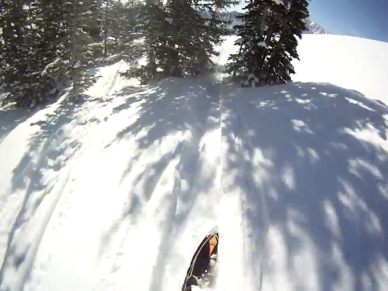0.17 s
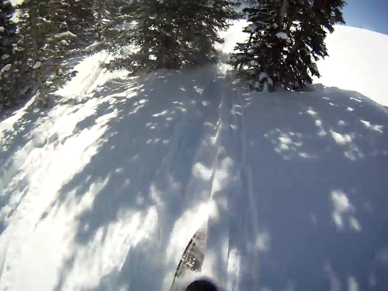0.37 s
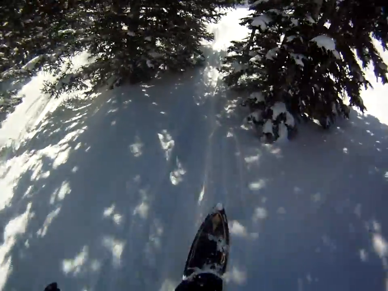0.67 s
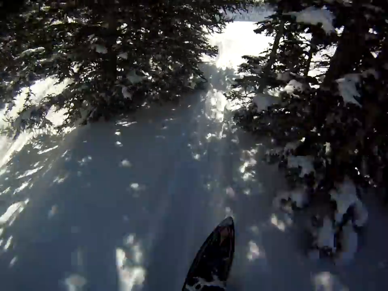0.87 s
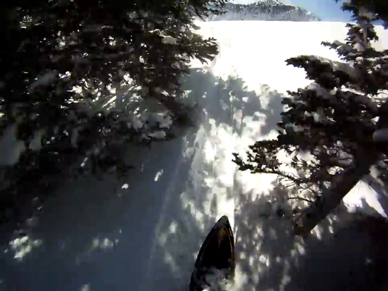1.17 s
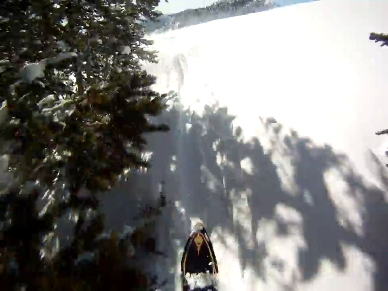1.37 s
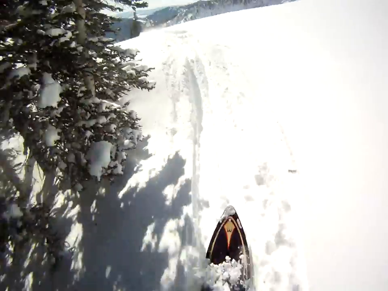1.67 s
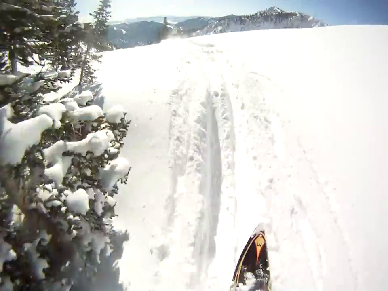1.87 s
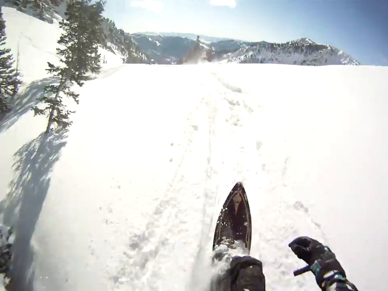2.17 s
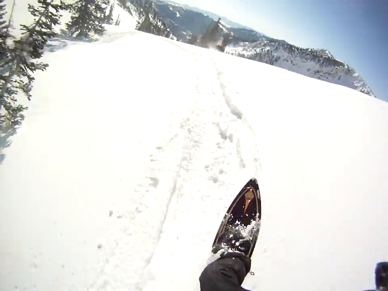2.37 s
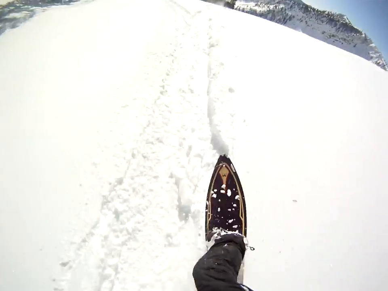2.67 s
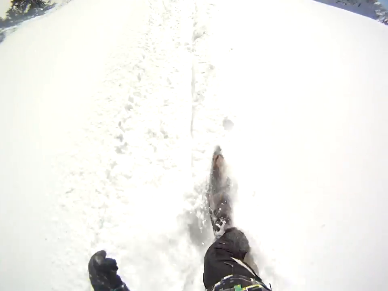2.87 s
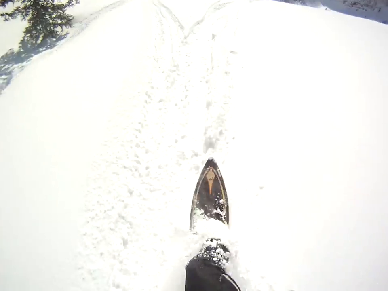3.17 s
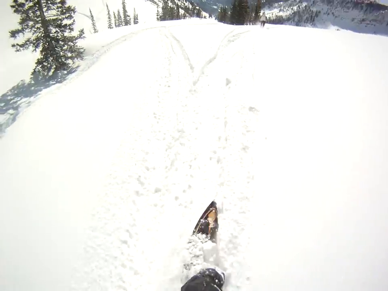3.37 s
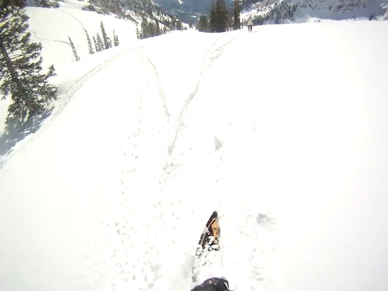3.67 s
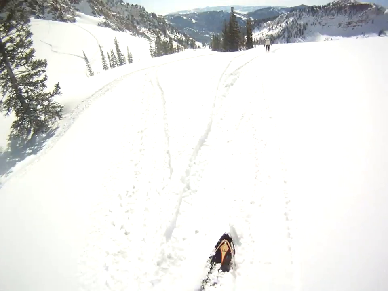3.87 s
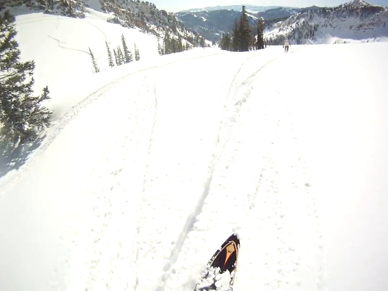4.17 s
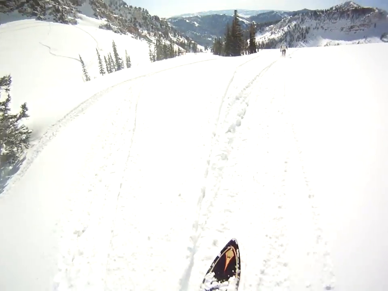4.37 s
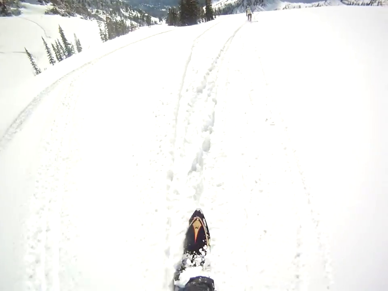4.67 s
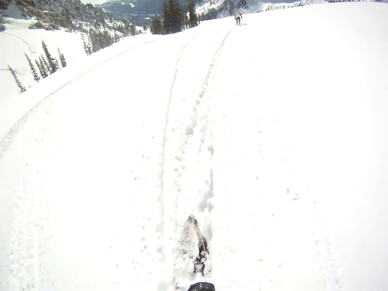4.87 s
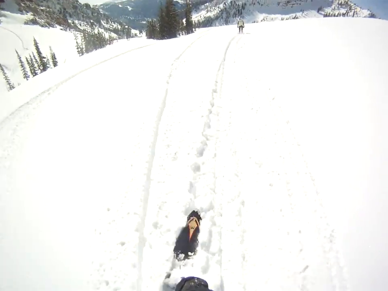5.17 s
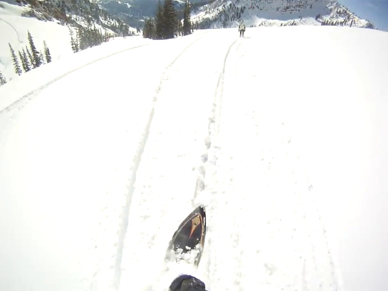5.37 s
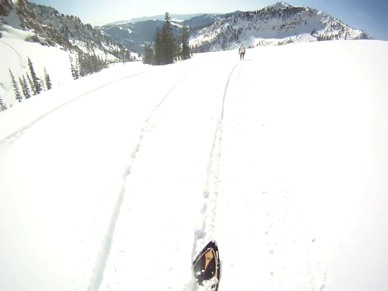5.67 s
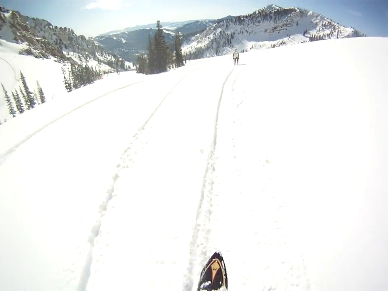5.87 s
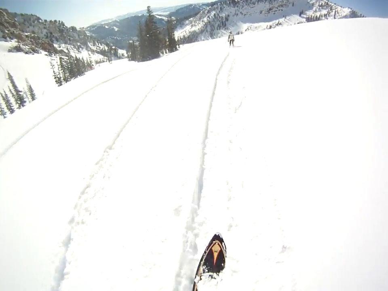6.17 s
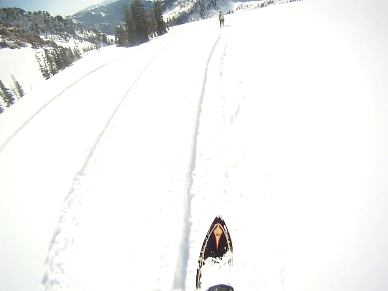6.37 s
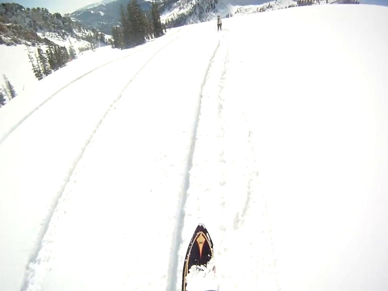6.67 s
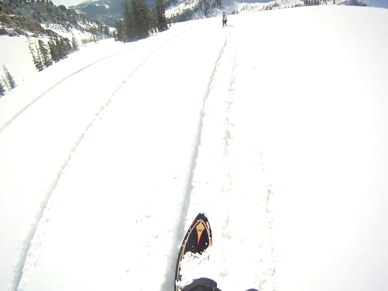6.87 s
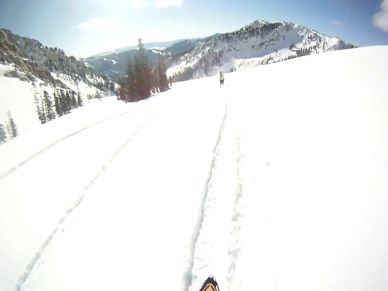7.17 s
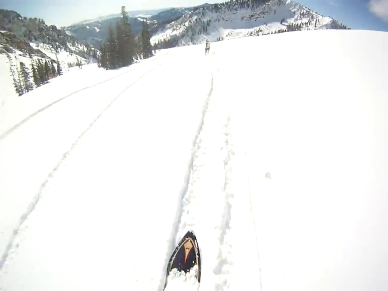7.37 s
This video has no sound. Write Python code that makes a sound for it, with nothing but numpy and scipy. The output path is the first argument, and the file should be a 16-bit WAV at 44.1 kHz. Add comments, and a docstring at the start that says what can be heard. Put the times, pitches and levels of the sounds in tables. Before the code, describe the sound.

Muffled, grainy rush of skis over snow, lumpy wind buffeting, sharp twig ticks and hollow clacks, easing into a quieter, steadier glide.

```python
"""Skis hiss through deep powder, a roar of crystal grains under crisper spray, heard inside a closed camera case.
Wind rumbles on the case as lumpy low noise, and sudden bumps swing the camera until its springy mount rings.
Gear knocks and flicking twigs are struck resonances; a faint whistle and a thin squeak are gliding tones.
A limiter ducks the loudest peaks, and slow sampling with held values mirrors the sound into the treble."""
import sys
import numpy as np
from scipy import signal
from scipy.fft import rfft, irfft
from scipy.io import wavfile
from scipy.ndimage import uniform_filter1d, minimum_filter1d

SR = 44100
rng = np.random.default_rng(int(sys.argv[2]) if len(sys.argv) > 2 else 0)


def transcribe(signal):
    """Save signal, clipped to [-1, 1], as a 16-bit WAV file at the path in sys.argv[1]."""
    frames = np.atleast_2d(signal).T
    limited = np.clip(frames, -1, 1)
    pcm = np.round(limited * 32767).astype(np.int16)
    wavfile.write(sys.argv[1], SR, pcm)


N = 332514
TIME, FREQS = np.arange(N) / SR, np.fft.rfftfreq(N, 1 / SR)

# airflow over the case, before the layer trims: t/s, level/dB
AIRFLOW = [(0, -39), (0.9, -41), (1.3, -36), (2.4, -42), (3.15, -43), (3.6, -40.5), (4.3, -44),
           (4.9, -43.5), (5.8, -45), (6.9, -41), (7.54, -38.5)]
# gusts of deep buffeting: middle t/s, length/s, level/dB
GUST_SWELLS = [(0.04, 0.13, -28), (0.554, 0.29, -33.5), (1.165, .16, -34), (1.673, 0.15, -26),
               (2.133, 0.15, -31.5), (2.42, 0.36, -32.5), (2.95, 0.21, -30), (3.203, 0.15, -35),
               (3.527, 0.27, -42.5), (4.18, 0.135, -42), (7.27, 0.23, -50)]
# colour of the wind rumble: f/Hz, relative level per Hz/dB
RUMBLE_COLOUR = [(30, -9.5), (60, 0.5), (85, 1.5), (125, -8), (200, -10.5), (300, -22), (420, -26.5),
                 (1500, -68)]
# colour of the deepest wind lumps: f/Hz, relative level per Hz/dB
BUFFET_COLOUR = [(10, -9), (24, 9.5), (40, -0.5), (60, 1), (100, -2), (300, -71)]
# a faint sinking whistle: start t/s, length/s, start f/Hz, end f/Hz
WHISTLE_GLIDE = (7.03, 0.21, 925, 810)
# a thin rising squeak: start t/s, length/s, start f/Hz, end f/Hz
SQUEAK_GLIDE = (7.07, 0.21, 3200, 4380)
# twigs and lumps that hit the case: t/s, level before trim/dB, brightness/dB per octave
TICK_HITS = [(0.0477, -18, 2), (0.0674, -28.5, -1), (0.324, -23.5, -8), (1.404, -31.5, -3),
             (1.515, -25, -6), (1.5358, -21, -10), (1.6254, -21, -13), (1.5454, -35, -6), (1.5918, -32, -3),
             (1.657, -23.5, 4), (1.6887, -21, -10), (1.711, -0.5, 0.0), (2.011, -25.5, -4.5),
             (2.373, -31.5, 0), (2.6444, -30, -1), (2.812, -39, -2), (2.8873, -30, -2), (2.9227, -28, -2),
             (6.4164, -34, -8), (6.483, -35, -10), (7.414, -35, 1), (7.4294, -27, -4)]
# resonances that ticks and crumbs ring with: f/Hz, relative level/dB, t60/s
SHELL_MODES = [(1120, -14, 0.015), (1620, -1, 0.0035), (2290, 0, 0.0087), (3040, -1, 0.0063),
               (3584, -0.5, 0.015), (4070, -3, 0.0052), (4850, 6, 0.0043), (5580, -5, 0.0031)]
# knocks of the gear: t/s, peak level/dB, brightness/dB per octave, favoured f/Hz
KNOCK_HITS = [(1.713, -24.5, 4.5, 920), (2.165, -18.5, 1.5, 1740), (2.424, -22.5, -8, 250),
              (2.448, -3, -3, 540), (2.450, -11.5, 2, 1600), (2.634, -15.5, 0.5, 575),
              (3.433, -19, -1, 855), (6.916, -16.5, -0.5, 870), (6.924, -20, 4, 1500),
              (7.246, -26.5, -5, 860), (7.2731, -12, -1, 595), (7.276, -19, -2, 1770),
              (7.281, -23, 2, 1610), (7.306, -29, 4, 2020), (7.410, -21, -2.5, 595)]
# resonances that knocks ring with: f/Hz, relative level/dB, t60/s
GEAR_MODES = [(241, -14.5, 0.039), (575, -5.5, 0.033), (865, -1.5, 0.026), (1012, -4.5, 0.03),
              (1130, 7, 0.012), (1645, -1, 0.013), (1870, -4.5, 0.029), (2100, 3, 0.013),
              (2760, -7, 0.0076), (3230, -8, 0.017)]
# bumps that shove the camera: t/s, level/dB, swing f/Hz
BUMP_SHOVES = [(0.034, -26, 67.6), (0.06, -23.5, 165), (0.315, -17.5, 101), (0.584, -27, 170),
               (0.591, -19.5, 67), (1.101, -14, 63.5), (1.154, -22.5, 114), (1.496, -18, 107),
               (1.603, -30, 65), (1.692, -14, 67), (2.002, -23.5, 89), (2.264, -24.5, 129),
               (2.447, 4.5, 117), (2.553, -29, 139), (2.582, -17, 54.7), (2.623, -22, 130),
               (2.635, -3.5, 81.5), (2.887, -19.5, 105), (3.128, -24, 107), (3.219, -29, 87),
               (3.437, -27, 82), (4.126, -33, 107), (6.92, -28, 93), (7.106, -23, 94), (7.249, -19.5, 101),
               (7.277, -19.5, 65), (7.314, -11, 81), (7.394, -22, 109), (7.413, -10, 56)]
# resonances of the mount, against the shove: f/Hz, relative level/dB, t60/s
MOUNT_MODES = [(82, -5.5, 0.18), (170, -1.5, 0.037), (263, -56, 0.029)]
# steady hiss of the skis, before a small trim: t/s, level/dB
GLIDE_LEVEL = [(0.0, -39), (0.67, -39.5), (1.22, -38), (1.55, -40), (1.7, -40), (2.04, -42.5),
               (2.27, -42.5), (2.56, -44), (2.96, -44), (3.11, -45.5), (3.44, -49), (4.37, -46.5),
               (4.68, -51), (6.19, -46.5), (6.7, -47), (7.54, -45.5)]
# swishes, where a ski digs in or a branch sweeps by: middle t/s, length/s, hiss level/dB, spray level/dB
SWISH_SWELLS = [(0.213, 0.17, -53, -47.5), (1.125, 0.21, -35.5, -41.5), (1.541, 0.034, -30, -37.5),
                (1.605, 0.044, -33.5, -46.5), (1.993, 0.2, -40, -65), (2.44, 0.051, -40.5, -49),
                (2.584, 0.15, -40, -53.5), (2.898, 0.12, -43.5, -53.5), (3.07, 0.067, -41, -54),
                (3.48, 0.047, -61, -53.5), (3.913, 0.16, -48.5, -61), (4.52, .10, -45.5, -64),
                (5.33, .12, -61, -59), (6.02, 0.31, -63, -58.5), (7.364, 0.25, -44, -52.5)]
# colour of the ski hiss, before the case: f/Hz, relative level per Hz/dB
HISS_COLOUR = [(100, -7), (300, -4.5), (480, -4.5), (730, -6), (1100, 0.5), (1500, 2.5), (2250, 1),
               (2700, -12), (3500, -12.5), (3900, -18.5), (5200, -22.5), (5900, -48.5)]
# colour of the crisp spray, before the case: f/Hz, relative level per Hz/dB
SPRAY_COLOUR = [(500, -8), (1500, -10), (2400, 1), (3400, 13), (4000, -2), (5200, -3.5), (5900, -29.5)]
# resonances of the case: f/Hz, width at half the dB lift/Hz, lift/dB
CASE_RESONANCES = [(572, 120, 6.5), (859, 148, 8), (1203, 324, 7), (1886, 95, 3), (2105, 280, 3),
                   (3500, 110, 1)]


def gain_of(db):
    """Decibels to amplitude."""
    return 10 ** (np.asarray(db) / 20)


def evened(x):
    """Scales to rms 1."""
    return x / np.sqrt(np.mean(x ** 2) + 1e-20)


def read(points):
    """Reads a spectrum table in dB at every frequency, along a log axis."""
    hz, db = np.transpose(points)
    return np.interp(np.log(FREQS + 1), np.log(hz), db)


def coloured(x, db):
    """Filters by a dB spectrum; rms 1."""
    return evened(irfft(rfft(x) * gain_of(db), N))


def drift(rate):
    """Slow random wander of rms 1, with little motion above rate in Hz."""
    spectrum = rfft(rng.standard_normal(N))
    return evened(irfft(spectrum / (1 + (FREQS / rate) ** 4), N))


def swell(middle, length):
    """A smooth rise and fall that passes half its height length seconds apart."""
    return 0.5 ** np.minimum((2 * (TIME - middle) / length) ** 2, 100)


def add(mix, s, sound):
    """Mixes a sound in at s seconds."""
    part = mix[max(round(s * SR), 0):][:len(sound)]
    part += sound[:len(part)]


def grains(per_s, spread_db):
    """Random clicks, most of them small and a few large; rms 1."""
    size = gain_of(spread_db * np.minimum(rng.exponential(1, N), 4.5))
    sign = rng.choice([-1, 1], N)
    present = rng.random(N) < per_s / SR
    return evened(size * sign * present)


def hum(hz, sharpness):
    """Noise through one resonance; rms 1."""
    detune = FREQS / hz - hz / (FREQS + 1)
    resonance_db = -10 * np.log10(1 + (sharpness * detune) ** 2)
    return coloured(rng.standard_normal(N), resonance_db)


def strike(modes, lift_db, scrape_db, scrape_s, crack_db, crack_s):
    """A sharp contact and brief scrape excite the lifted modes, under the contact's dry crack; peak 1."""
    t = np.arange(SR // 12) / SR
    hz, mode_db, t60 = np.transpose(modes)[:, :, None]
    force = gain_of(scrape_db) * rng.standard_normal(len(t)) * np.exp(-t / scrape_s)
    force[0] += 1  # the sharp contact
    detuned = hz * (1 + 0.0056 * rng.standard_normal(hz.shape))
    side = (-1) ** np.arange(len(hz))[:, None]  # neighbouring modes swing opposite ways
    decay = gain_of(mode_db + lift_db[:, None] - 60 * t / t60)
    ring = side * np.sin(2 * np.pi * detuned * t) * decay
    blow = signal.fftconvolve(force, ring.sum(0))[:len(t)]
    u = t / crack_s
    crack = u * (2 - u) * np.exp(-u)
    blow = blow / abs(blow).max() - gain_of(crack_db) * crack / crack.max()
    return blow / abs(blow).max()


def tone(glide, waver, ratio=1):
    """A thin tone that swells and fades as it glides, wavering a little, at ratio times the given pitch."""
    start, length, from_hz, to_hz = glide
    u = np.clip((TIME - start) / length, 0, 1)
    hz = ratio * (from_hz + (to_hz - from_hz) * u) * (1 + waver * drift(rate=113))
    turns = np.cumsum(hz) / SR
    return np.sqrt(2) * np.sin(2 * np.pi * turns) * np.sin(np.pi * u)


def jolts(airflow, hz=95, length_s=0.0047):
    """Small unevennesses of the slope jog the camera at random, harder where the airflow is stronger."""
    t = np.arange(SR // 12) / SR
    jog = np.sin(2 * np.pi * hz * t) * t * np.exp(-t / length_s)
    jogs = signal.oaconvolve(grains(per_s=16, spread_db=1.5), jog)[:N]
    return airflow * evened(jogs) * gain_of(-9)


def wind():
    """Lumpy turbulence presses on the case, keeps the mount humming and blows a faint hollow note, over jolts."""
    airflow = gain_of(np.interp(TIME, *np.transpose(AIRFLOW)) + 0.5)
    gusts = sum(gain_of(db) * swell(s, length) for s, length, db in GUST_SWELLS)
    eddies = drift(rate=22)
    buffet = coloured(rng.standard_normal(N), read(BUFFET_COLOUR))
    buffet *= np.hypot(airflow * gain_of(-4.5), gusts) * gain_of(0.89 * eddies)
    rumble = coloured(rng.standard_normal(N), read(RUMBLE_COLOUR))
    rumble *= gain_of(2.6 * eddies - 4.5)
    mount = hum(hz=85.6, sharpness=5.6) * gain_of(-2.5)
    hollow = hum(hz=591, sharpness=9.4) * gain_of(-55.5)
    body = (rumble + mount) * np.hypot(airflow, gusts * gain_of(-8))
    return buffet + body + hollow + jolts(airflow)


def whistle():
    """A faint wavering tone sinks over the hiss."""
    return gain_of(-52) * tone(WHISTLE_GLIDE, waver=0.012)


def squeak():
    """A thin rising tone, like a sleeve sliding faster and faster, and a weaker companion above it."""
    main = tone(SQUEAK_GLIDE, waver=0.003)
    companion = gain_of(-8) * tone(SQUEAK_GLIDE, waver=0.005, ratio=1.2)
    return gain_of(-61) * (main + companion)


def ticks():
    """Twigs and crumbs flick the shell of the case, exciting its short, bright modes."""
    out, octaves = np.zeros(N), np.log2(np.transpose(SHELL_MODES)[0])
    for s, db, bright in TICK_HITS:
        tick = strike(SHELL_MODES, bright * octaves, scrape_db=-15, scrape_s=0.002, crack_db=-6, crack_s=0.00005)
        add(out, s, gain_of(db - 0.5) * tick)
    return out


def knocks(focus_db=8):
    """Hard gear clacks; where it lands decides which modes are favoured."""
    out, mode_hz = np.zeros(N), np.transpose(GEAR_MODES)[0]
    for s, db, bright, hz in KNOCK_HITS:
        octaves = np.log2(mode_hz / hz)
        nearness = np.exp(-(octaves / 0.2) ** 2)
        lift_db = bright * octaves + focus_db * nearness
        knock = strike(GEAR_MODES, lift_db, scrape_db=-18, scrape_s=0.002, crack_db=-7.5, crack_s=0.00025)
        add(out, s, gain_of(db) * knock)
    return out


def bumps(rise_cycles=0.55, softness=2.66):
    """Each bump swings the camera once or twice; the mount then rings out."""
    out, t = np.zeros(N), np.arange(SR // 4) / SR
    ring = sum(np.sin(2 * np.pi * hz * t) * gain_of(db - 60 * t / t60) for hz, db, t60 in MOUNT_MODES)
    for s, db, hz in BUMP_SHOVES:
        u = t * hz / rise_cycles  # the shove's envelope peaks at u = 1
        shove = np.sin(2 * np.pi * hz * t) * (u * np.exp(1 - u)) ** softness
        ring_in = 1 - np.exp(-3 * u)
        add(out, s, gain_of(db) * (shove + ring * ring_in))
    return out


def snow(spray_under_db=-15.5, spray_growth=1.17):
    """Crystals shear under the skis; crisper spray flies up and drops crumbs on the case; swishes swell all."""
    glide_db = np.interp(TIME, *np.transpose(GLIDE_LEVEL)) + 0.5
    hiss_level = gain_of(glide_db)
    # the spray lies under the hiss and follows its level changes more steeply
    mean_db = glide_db.mean()
    spray_level = gain_of(mean_db + spray_under_db + spray_growth * (glide_db - mean_db))
    for s, length, hiss_db, spray_db in SWISH_SWELLS:
        swish = swell(s, length)
        hiss_level = np.hypot(hiss_level, gain_of(hiss_db) * swish)
        spray_level = np.hypot(spray_level, gain_of(spray_db) * swish)
    case_db = sum(db / (1 + (2 * (FREQS - hz) / width) ** 4) for hz, width, db in CASE_RESONANCES)
    pressure = drift(rate=8.9)  # the load on the skis flutters over uneven snow
    hiss = coloured(grains(per_s=9000, spread_db=2.0), read(HISS_COLOUR) + case_db)
    hiss *= hiss_level * gain_of(1.08 * pressure)
    spray = coloured(grains(per_s=3700, spread_db=0.5), read(SPRAY_COLOUR) + case_db)
    spray *= spray_level * gain_of(1.74 * pressure)
    spray *= gain_of(1.1 * drift(rate=120) - 1.7)  # it arrives in small crunchy clumps
    no_lift = np.zeros(len(SHELL_MODES))
    crumb = strike(SHELL_MODES, no_lift, scrape_db=-7, scrape_s=0.0046, crack_db=-13, crack_s=0.00005)
    crumbs = evened(signal.oaconvolve(grains(per_s=40, spread_db=1.0), evened(crumb))[:N])
    crumbs *= spray_level * gain_of(-9.5)
    return hiss + spray + crumbs


def scene():
    """Everything reaches one microphone, fed alike to both channels."""
    tones = whistle()
    mono = snow() + wind() + bumps() + knocks() + ticks() + tones + squeak()
    return np.tile(mono, (2, 1))


def limit(x, ceiling_db=-7, recover_db_per_s=170, smooth_s=0.002):
    """Turns the gain down when the sound passes the ceiling, holds it briefly, then lets it back up."""
    level = uniform_filter1d(abs(x[0]), size=48)
    over_db = np.maximum(20 * np.log10(level + 1e-9) - ceiling_db, 0)
    over_db = -minimum_filter1d(-over_db, size=1401, origin=700)  # holds the peak for 1400 samples
    fall = TIME * recover_db_per_s
    held_db = np.maximum.accumulate(over_db + fall) - fall
    keep = np.exp(-1 / (smooth_s * SR))
    cut_db = signal.lfilter([1 - keep], [1, -keep], held_db)
    return x / gain_of(cut_db)


def record(dry, full_scale=0.87, hold_hz=12000, edge_hz=15380):
    """Limiter and soft overload, slow sampling with held values (treble mirror images), then the band limit."""
    loud = limit(dry)
    loud = loud / (1 + (loud / full_scale) ** 4) ** (1 / 4)
    slow = signal.resample_poly(loud, hold_hz, SR, axis=1)
    steps = np.repeat(slow, 4, axis=1)
    held = signal.resample_poly(steps, SR, 4 * hold_hz, axis=1)[:, :N]
    band_limit = signal.firwin(511, edge_hz, window=("kaiser", 9), fs=SR)
    return signal.oaconvolve(held, band_limit[None], "same")


dry = scene()
out = record(dry)
transcribe(out)
```